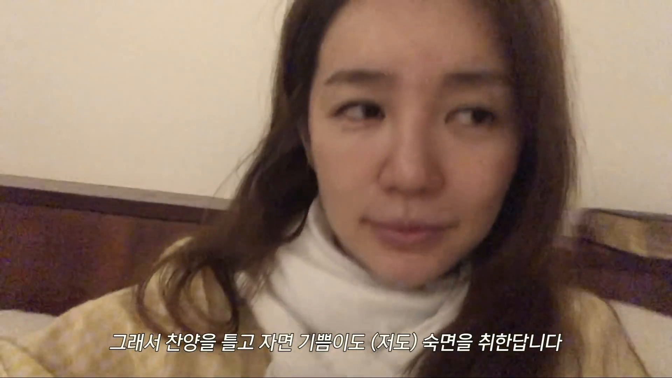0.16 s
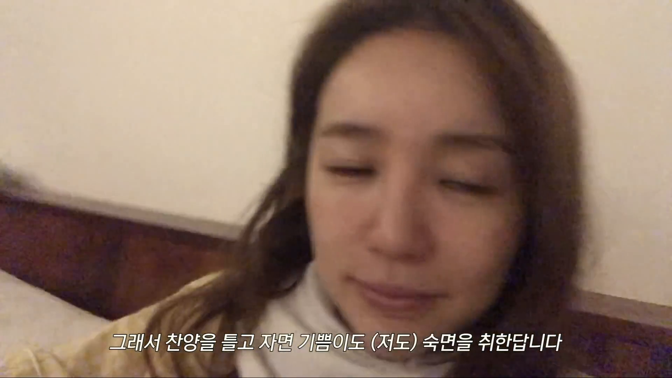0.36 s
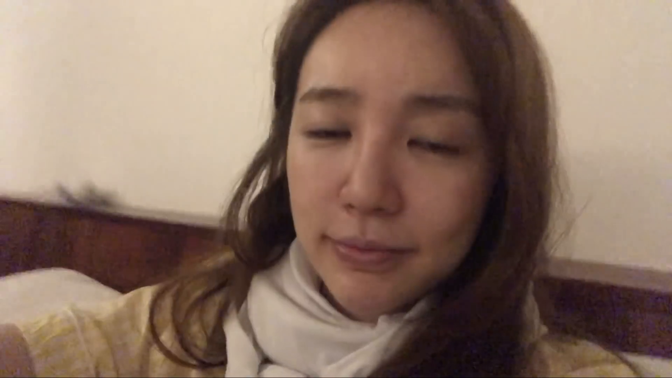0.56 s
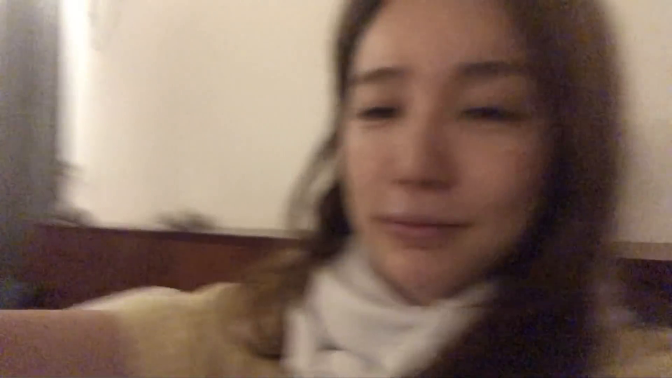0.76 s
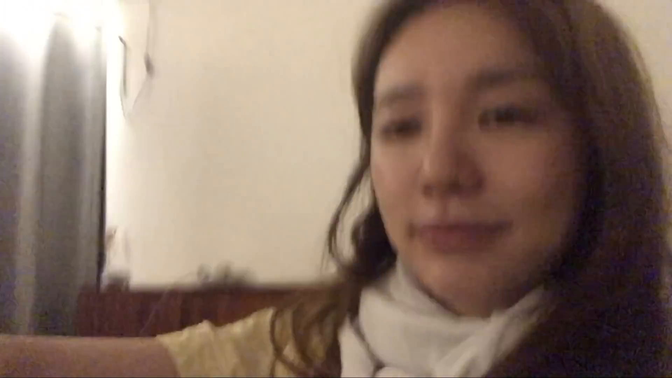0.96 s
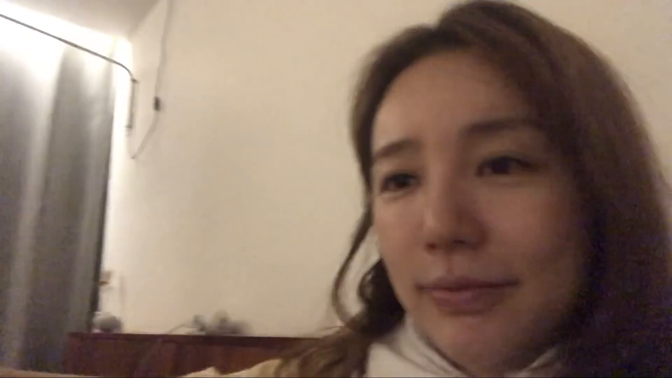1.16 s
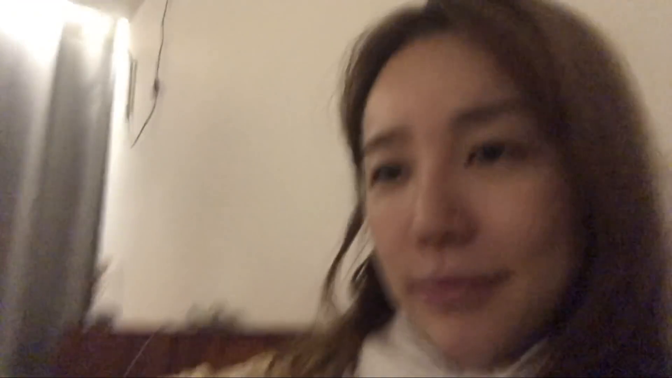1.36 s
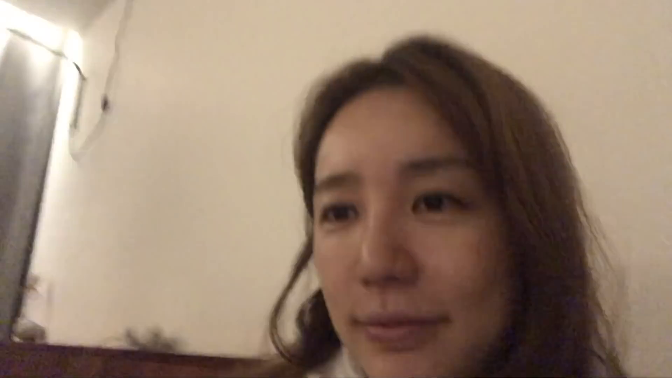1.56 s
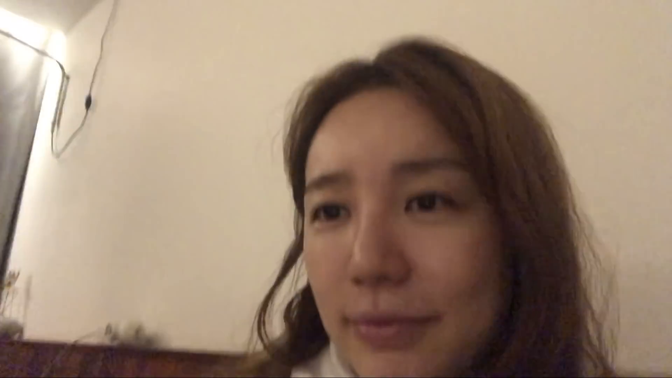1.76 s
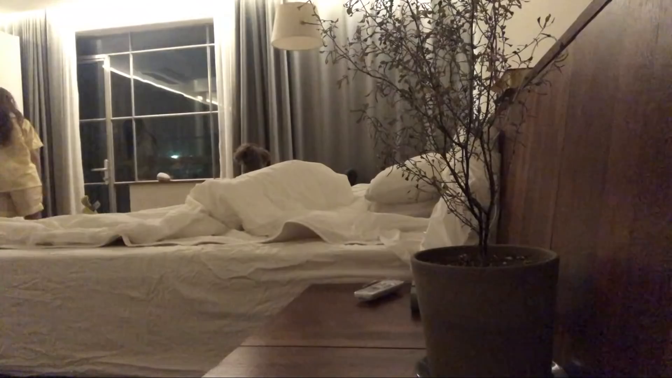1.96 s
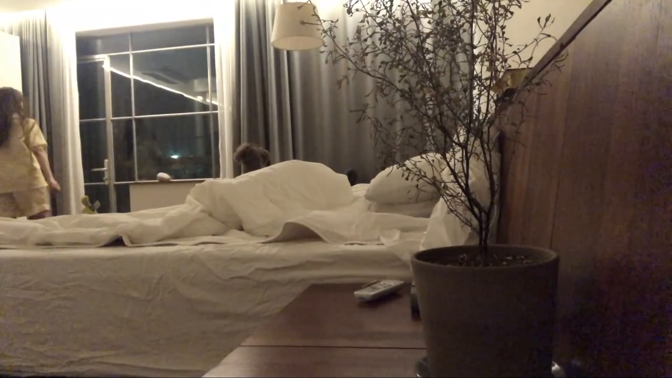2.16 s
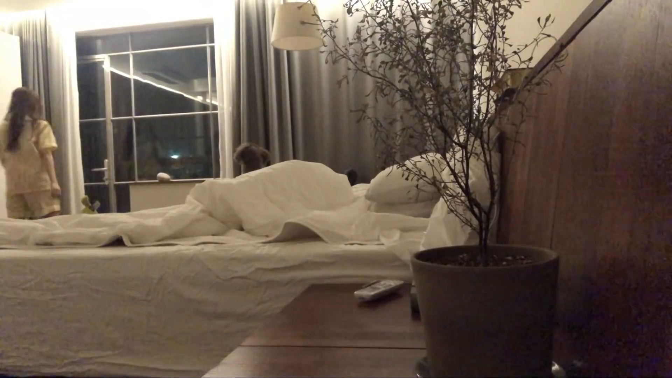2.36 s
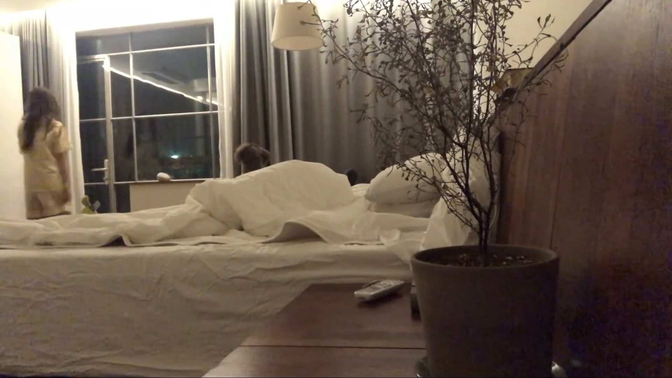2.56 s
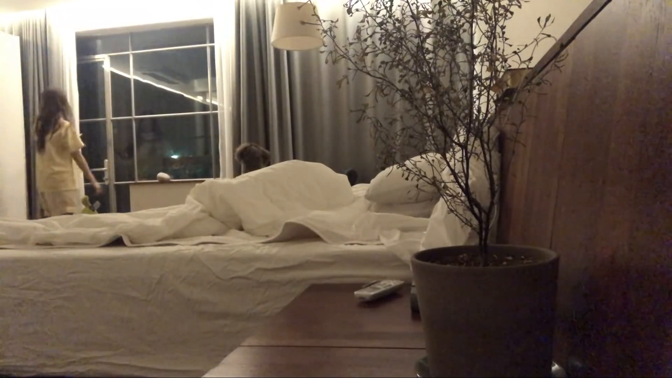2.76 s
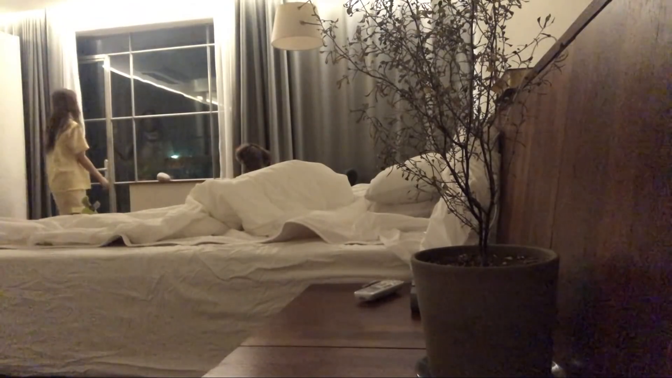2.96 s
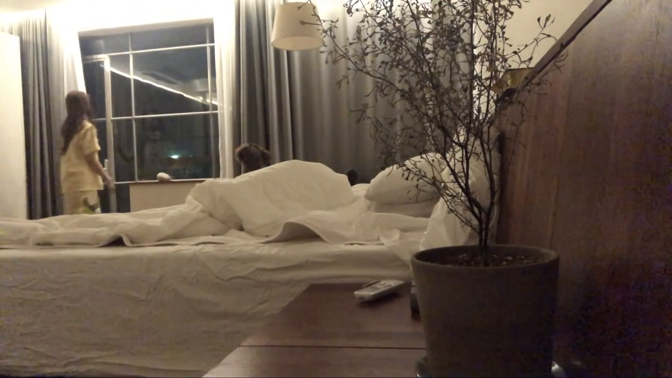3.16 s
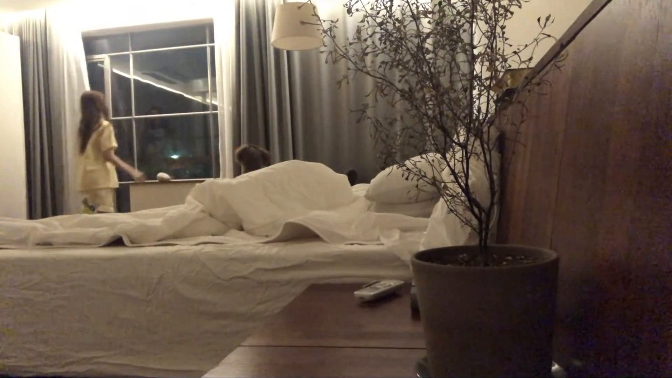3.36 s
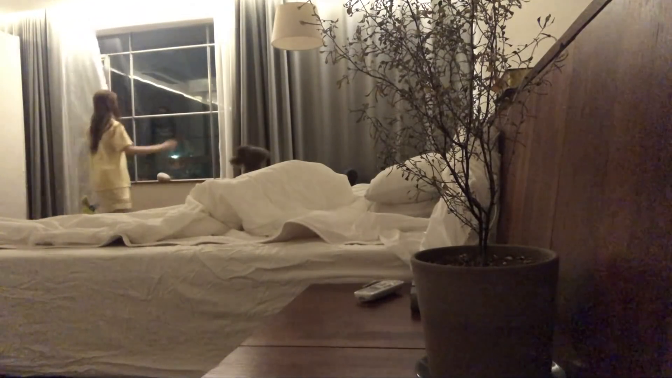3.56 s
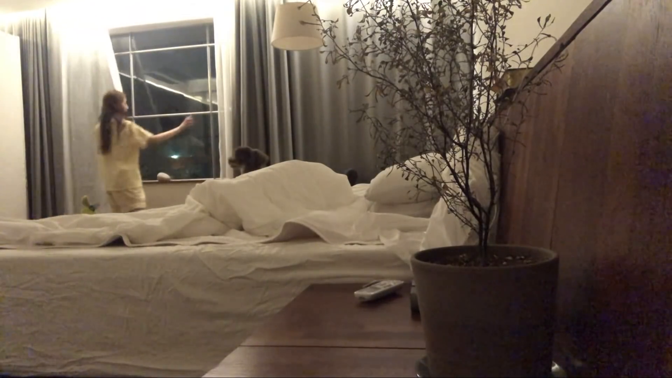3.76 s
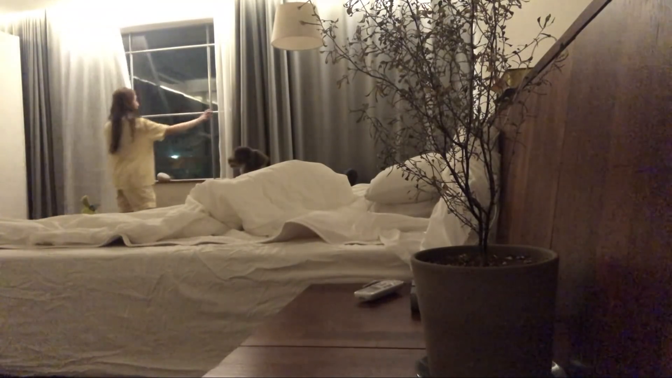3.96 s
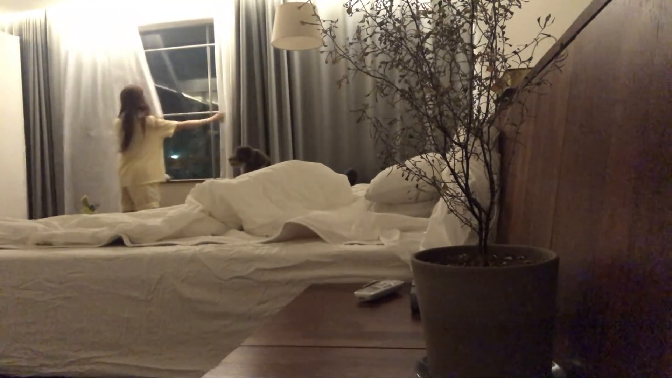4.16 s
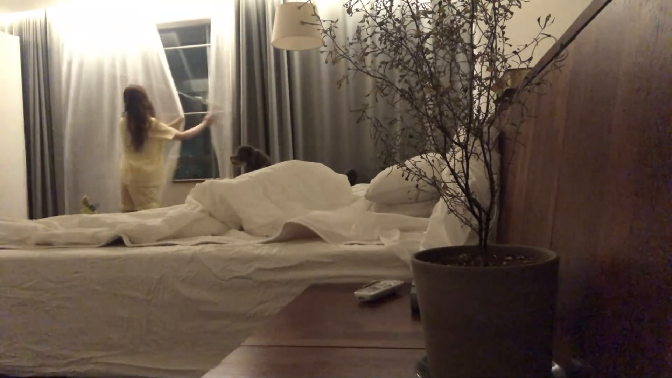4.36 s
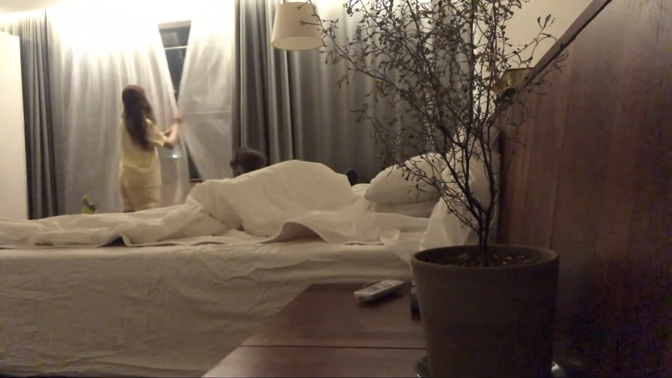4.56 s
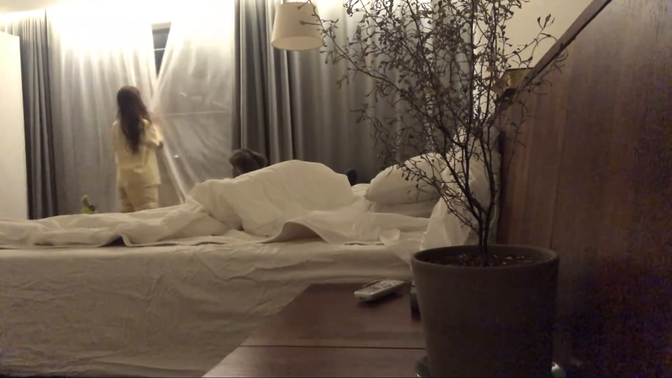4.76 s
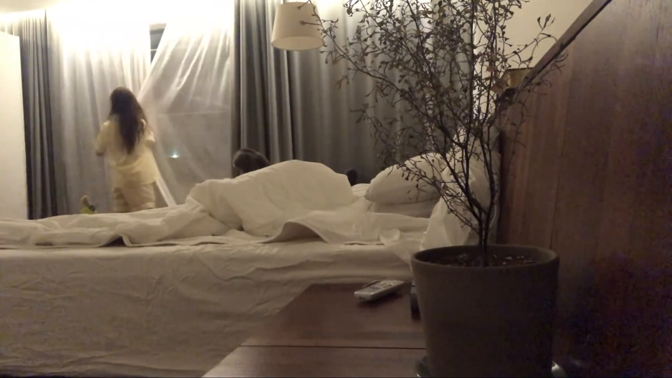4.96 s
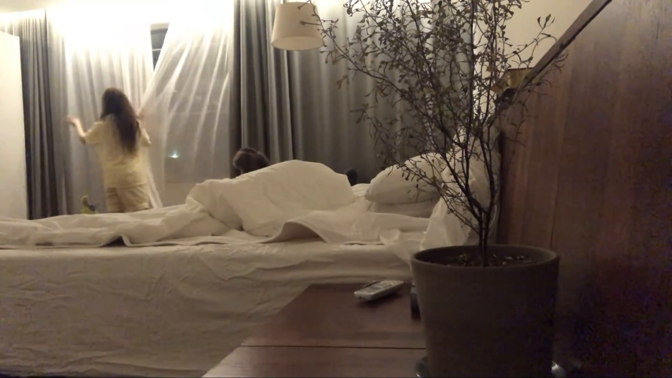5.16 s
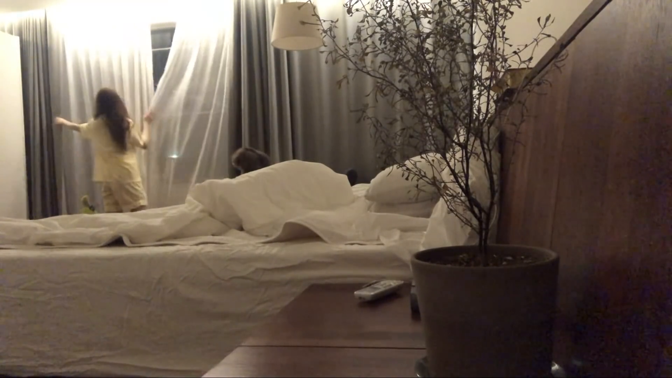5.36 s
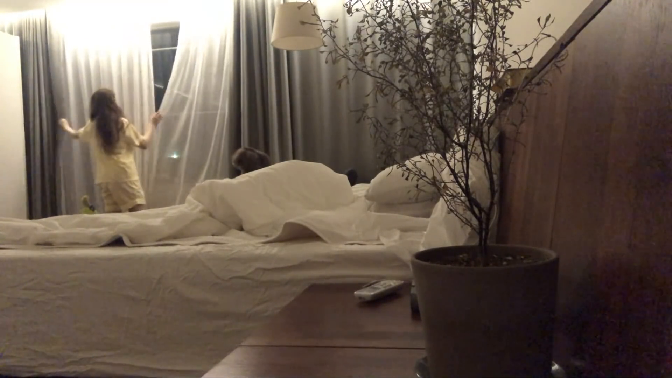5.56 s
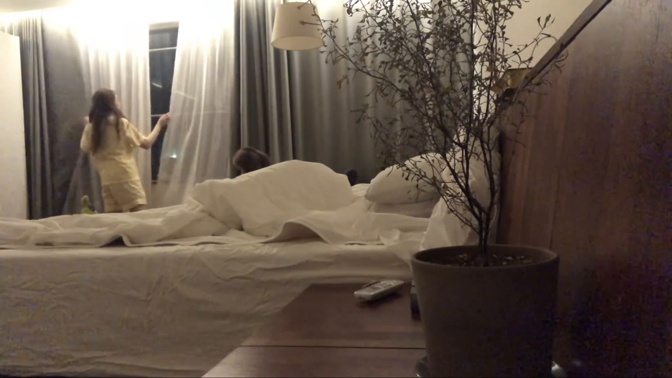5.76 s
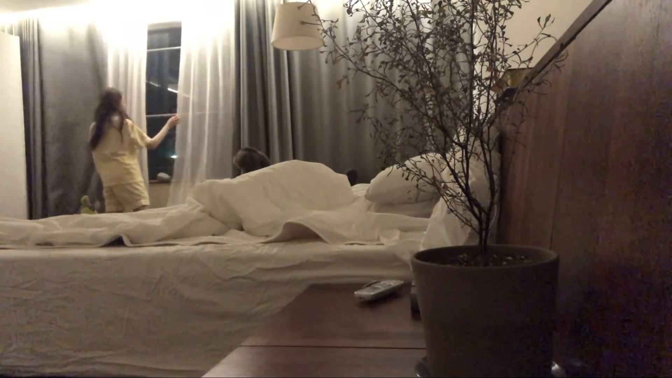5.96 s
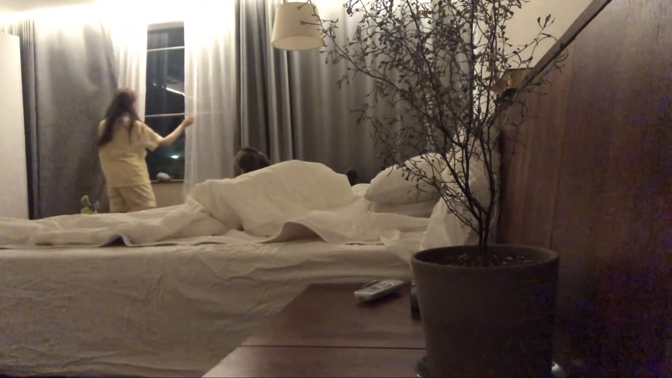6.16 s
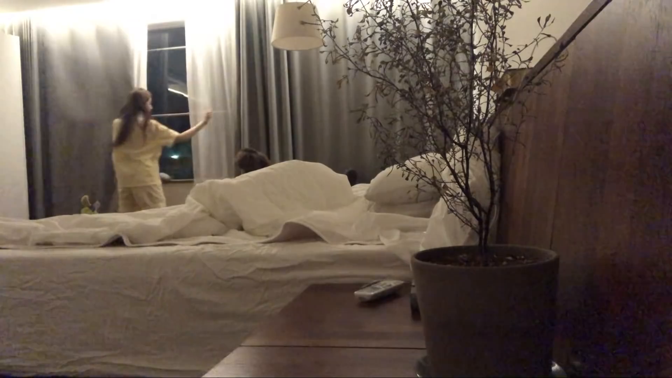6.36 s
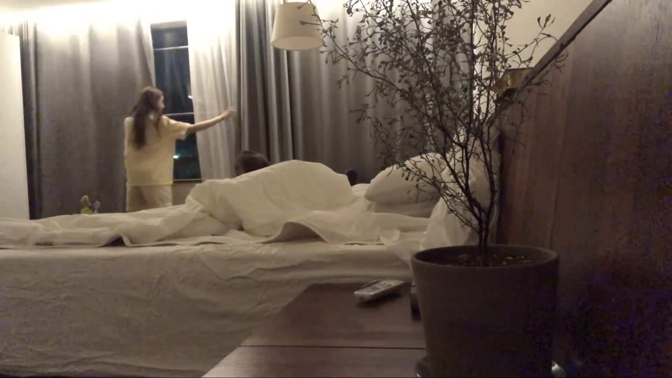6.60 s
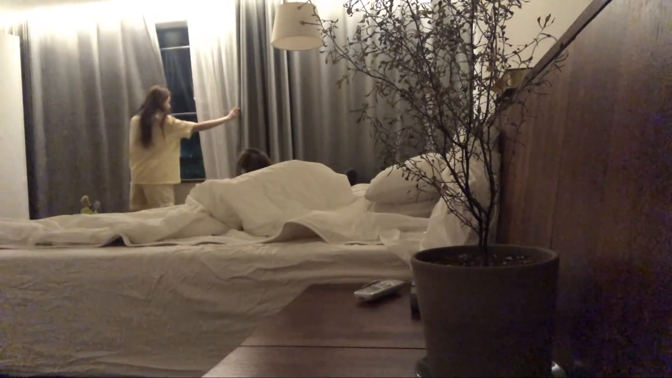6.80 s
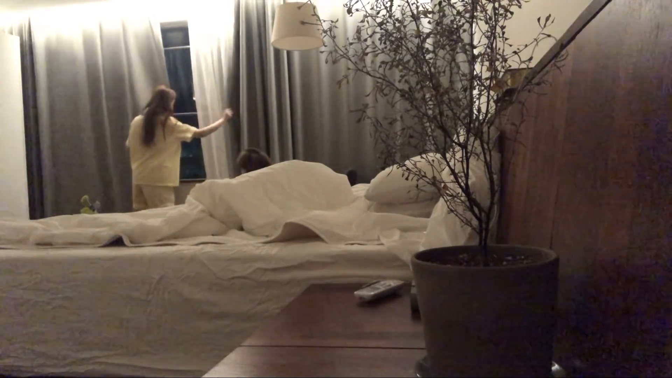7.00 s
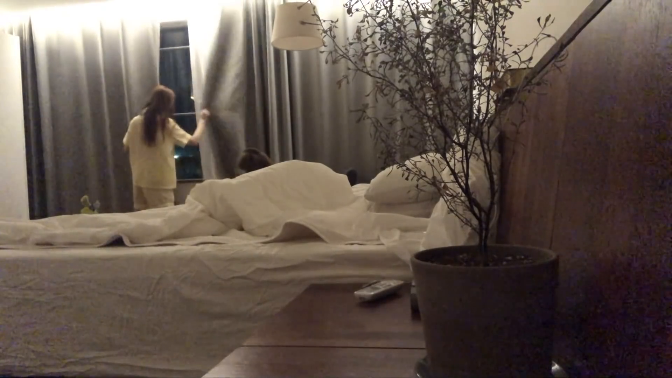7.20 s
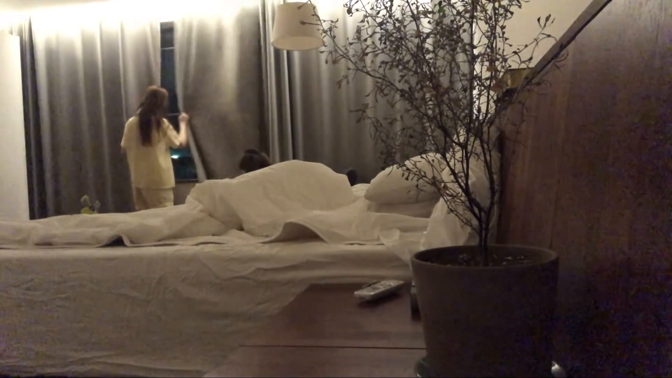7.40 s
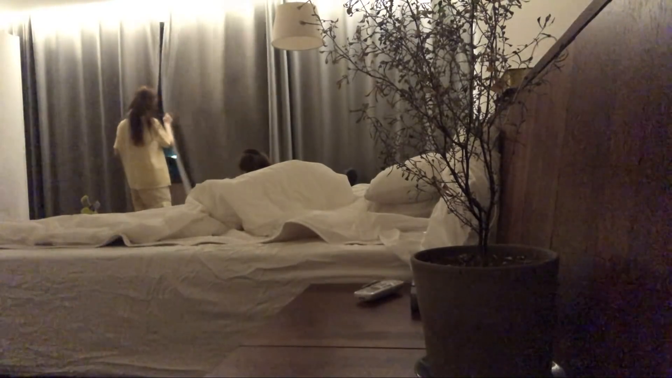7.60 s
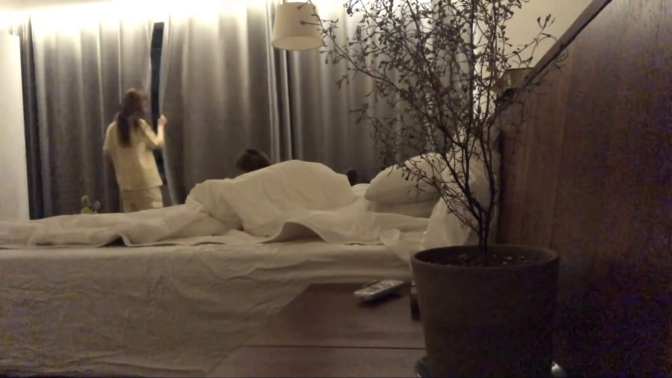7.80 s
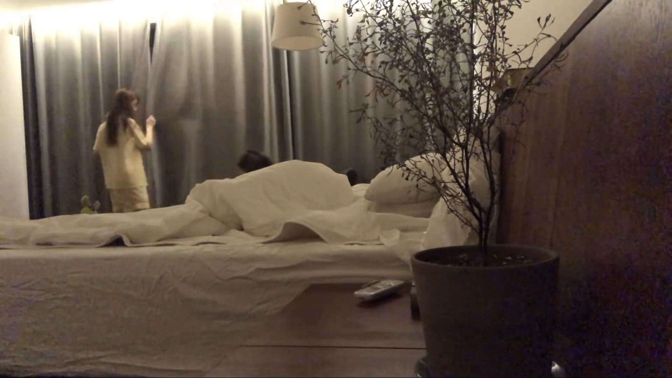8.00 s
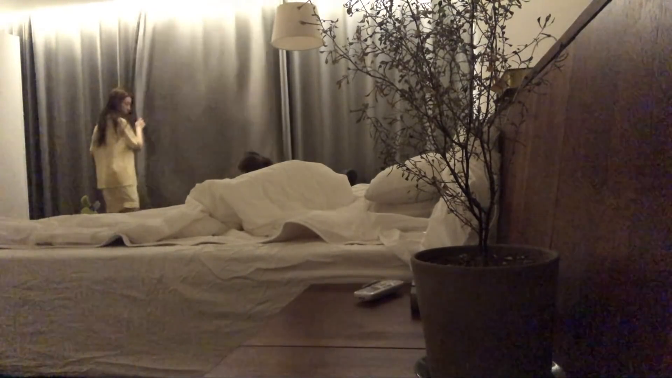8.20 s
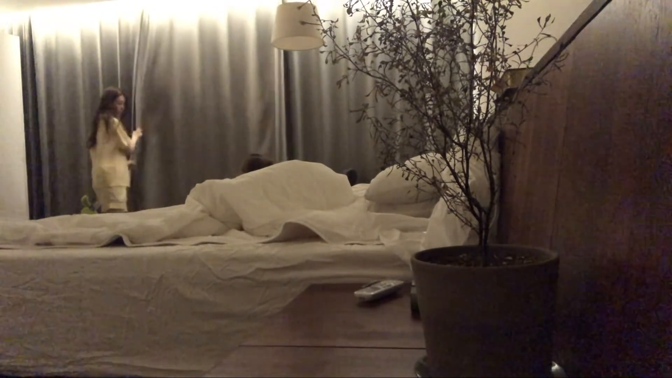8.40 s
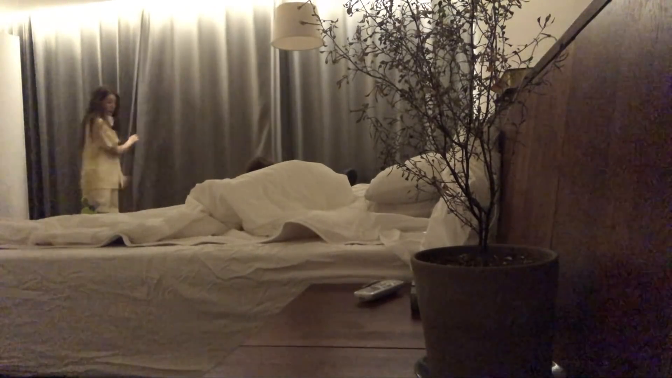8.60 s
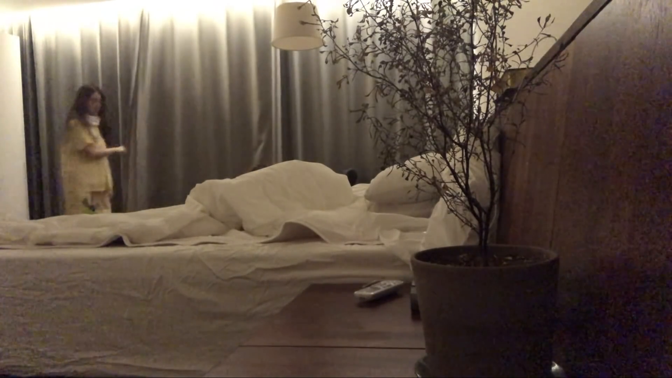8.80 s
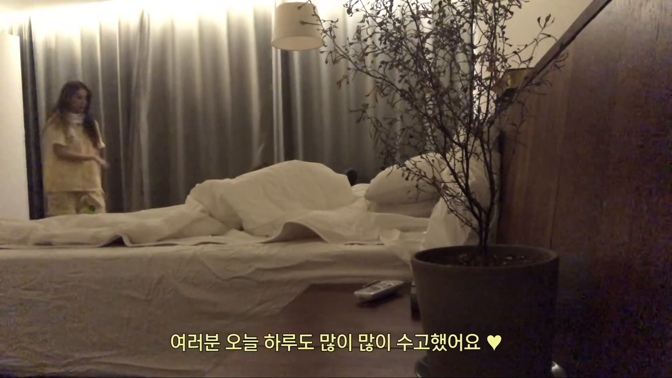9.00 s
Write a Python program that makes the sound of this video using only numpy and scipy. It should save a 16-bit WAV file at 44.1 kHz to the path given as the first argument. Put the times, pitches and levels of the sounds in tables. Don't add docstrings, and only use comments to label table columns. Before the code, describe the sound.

From 0 to 2 s the sound is close and quiet: fine bedding rustle strongest at the start, dull quilt rub, light taps and a thin metal charm ringing. Uneven grip creaks cluster at 0.5-1.1 s, with a hard slip at 0.8, fainter ones following; a soft low hum swells until 2 s. Then near-silent room tone, faint steps and cloth brushing. From 3.5 s gliders rattle brightly along a hollow rail, with sharp metallic knocks, swishing fabric and low wall thumps; a second tug peaks around 4.7 s. A lull with billowing folds follows at about 5-5.5 s. Heavier curtain rattle and dense knocks run 5.7-6.8 s, the rail singing roughly and sinking in pitch. The last curtain rattles at 7-7.8 s with frame boom, a small wavering squeak near 7.9, and lesser tugs around 8.2. Soft cloth and two tiny falling snaps at 8.8 end it, with a short room tail.

```python
import sys
import numpy as np
from scipy import signal
from scipy.fft import rfft, irfft, next_fast_len
from scipy.io import wavfile
from scipy.ndimage import uniform_filter1d

SR = 44100
rng = np.random.default_rng(int(sys.argv[2]) if len(sys.argv) > 2 else 0)


def rack_gain(trim_db):
    fader = np.asarray(trim_db, float)
    return 10 ** (fader / 20)


def digitize_waveform(pressure):
    field = np.atleast_2d(pressure).T
    bounded = np.clip(field, -1, 1)
    quanta = np.round(bounded * 32767).astype(np.int16)
    wavfile.write(sys.argv[1], SR, quanta)


N = 398840


def rms_one(x):
    return x / np.sqrt(np.mean(x ** 2) + 1e-20)


def in_time(rows):
    s, *columns = np.transpose(rows)
    t = np.arange(N) / SR
    gate = (t >= s[0]) & (t <= s[-1] + 0.02)
    return [np.interp(t, s, c) for c in columns] + [gate]


def swells(rows):
    t = np.arange(0, N + 40, 40) / SR
    s, *hold, level_db, rise, fall = np.transpose(rows)[:, :, None]
    before = 20 * np.maximum((s - t) / rise, 0)
    after = 20 * np.maximum((t - s - sum(hold)) / fall, 0)
    loudest = np.max(level_db - before - after, axis=0)
    return np.interp(np.arange(N) / SR, t, np.maximum(loudest, -130))


def drift(rate):
    r = np.exp(-80 * np.pi * rate / SR)
    noise = rng.standard_normal(N // 40 + 2002)
    slow = signal.lfilter([1], [1, -2 * r, r * r], noise)[2000:]
    return np.interp(np.arange(N) / 40, np.arange(len(slow)), rms_one(slow))


def colour(x, spectrum):
    size = next_fast_len(N)
    hz, level_db = np.transpose(spectrum)
    log_hz = np.log(np.arange(size // 2 + 1) * SR / size + 1)
    gain = rack_gain(np.interp(log_hz, np.log(hz), level_db, -90, -90))
    return rms_one(irfft(rfft(x, size) * gain, size)[:N])


def resonate(x, modes):
    out = 0
    for k, (hz, width_hz, level_db) in enumerate(modes):
        r = np.exp(-np.pi * width_hz / SR)
        poles = [1, -2 * r * np.cos(2 * np.pi * hz / SR), r * r]
        out = out + (-1) ** k * rack_gain(level_db) * signal.lfilter([1 - r * r, 0, r * r - 1], poles, x)
    return rms_one(out)


def grains(per_s, spread_db, clump_db):
    sizes = rack_gain(spread_db * np.minimum(rng.exponential(1, N), 5)) * rng.standard_normal(N)
    contacts = rng.random(N) < per_s / SR
    return rms_one(sizes * contacts * rack_gain(clump_db * drift(16.7)))


def add(out, s, sound):
    at = round(s * SR)
    out[at:at + len(sound)] += sound[:N - at]


def struck(rows):
    out = np.zeros(N)
    for s, level_db, hz, t60 in rows:
        t = np.arange(int(t60 * SR)) / SR
        decay = rack_gain(level_db - 60 * t / t60)
        add(out, s, decay * (1 - np.exp(-t * hz * 2.0)) * np.sin(2 * np.pi * hz * t))
    return out


# f/Hz, level/dB per Hz
FLOOR_SPECTRUM = [(24, -27), (40, 24), (71, 7), (151, -43), (219, 7), (513, -6), (582, 2), (1880, -12.5),
                  (7280, -24), (15800, -33)]


def room_tone():
    return rack_gain(-73.5) * colour(rng.standard_normal(N), FLOOR_SPECTRUM)


# t/s, rustle level/dB, rise/s, fall/s per 20 dB
STIRS = [
    (0.005, -41, .1, .05),
    (.27, -53.5, 3.8, 0.25),
    (.46, -58, .27, 0.4),
    (.63, -58, .23, 0.4),
    (.81, -60.5, .27, 1.1),
    (.98, -55, .22, 0.06),
    (1.1, -56.5, .14, .12),
    (1.42, -64, .9, 1),
    (1.92, -64.5, 1.3, .16),
]
# f/Hz, level/dB per Hz
RUSTLE = [(1180, -43), (2000, -8.5), (2440, -8.5), (3220, -7.5), (3990, -10), (6600, -13.5), (14500, -22),
          (15800, -21)]
# t/s, level/dB
QUILT_RUB = [(0, -48), (.05, -55.5), (.3, -53), (.45, -59.5), (1.15, -63), (1.25, -64.5), (2.0, -66)]
# f/Hz, level/dB per Hz
RUB_SPECTRUM = [(180, -29), (300, -3), (539, -1), (673, -2.5), (1400, -6.5), (1750, -9), (2500, -26),
                (3250, -50), (5500, -120)]


def bedding():
    rub_db, rubbing = in_time(QUILT_RUB)
    rustle = rack_gain(swells(STIRS)) * colour(grains(9000, 0.65, 0.8), RUSTLE)
    return rustle + rubbing * rack_gain(rub_db) * colour(grains(4000, 0.7, 0.99), RUB_SPECTRUM)


# t/s, level/dB, f/Hz, t60/s
CHARM = [(0.0, -57, 3370, 3.6), (.14, -54, 3106, 1.6), (.14, -62, 2659, 2.0), (.28, -57, 1992, .9)]


def charm():
    return struck(CHARM)


# t/s, peak level/dB, f/Hz, top level/dB
KNOCKS = [(0.078, -37, 1780, -28), (3.4441, -41.5, 5000, -9), (3.6032, -30, 3980, -38),
          (3.654, -14.5, 6570, -14), (3.7239, -26, 3660, -35), (3.7663, -25, 4500, -30),
          (3.8616, -26, 4590, -35), (3.9404, -30, 2180, -40), (4.135, -16.5, 6740, -32.5),
          (4.239, -19.5, 3930, -41), (4.2961, -28, 7480, -30), (4.3805, -27, 7500, -8),
          (4.4005, -16, 4760, -12), (4.6262, -18.5, 3670, -21), (4.7185, -12, 3230, -36),
          (4.803, -17, 4300, -25), (5.5055, -32, 5070, 1.5), (5.587, -20, 6600, -24),
          (5.7315, -38, 3700, -45), (5.7705, -26, 4200, -44), (5.817, -18, 3610, -15),
          (5.854, -20, 3600, -40), (5.891, -17, 3790, -29), (5.942, -17, 3600, -33),
          (6.0001, -20, 4300, -25), (6.0267, -16, 5400, -18), (6.036, -17, 7600, -18),
          (6.0965, -15, 3670, -24), (6.2467, -12.5, 3460, -41.5), (6.262, -23, 6200, -25),
          (6.3613, -28, 4600, -40), (6.3977, -20, 4110, -40), (6.511, -23, 4000, -35),
          (6.5894, -13.5, 4160, -34), (6.692, -26, 4400, -10), (6.7426, -18, 4600, -25),
          (7.0265, -31, 3450, -40), (7.0475, -29, 4560, -35), (7.0763, -20.5, 4200, -40),
          (7.2051, -29, 4300, -35), (7.3338, -30, 6640, -35), (7.3782, -18.5, 2200, -18),
          (7.5249, -23, 4100, -35), (7.6653, -18.5, 3380, -40), (7.7664, -30, 3730, -35),
          (7.8996, -36, 5700, -40), (8.0632, -34, 3780, -30), (8.2213, -28, 3260, -40),
          (8.2651, -28, 4580, 9), (8.4582, -38.5, 4370, -34)]


def knocks():
    out, t = np.zeros(N), np.arange(SR // 3) / SR
    onset = np.minimum(t / 0.0023, 1)
    short, longer = [rack_gain(-60 * t / t60) * onset for t60 in (0.045, 0.15)]
    below = signal.butter(2, 9000, fs=SR, output="sos")
    above = signal.butter(2, 8500, "high", fs=SR, output="sos")
    noises = rng.standard_normal((len(KNOCKS), len(t)))
    for (s, level_db, hz, top_db), noise in zip(KNOCKS, noises):
        ring = resonate(noise, [(hz, 300, 0), (hz * 1.2, 1500, -9)])
        rail = resonate(noise, [(2200, 340, 7.0), (3500, 320, 3.5), (4600, 1500, 7.1), (6770, 1830, 5.8)])
        rail = signal.sosfilt(below, rail)
        crack = rack_gain(top_db + 3.5) * signal.sosfilt(above, noise)
        flurry = (0.32 * short + 0.22 * longer) * (rail + crack)
        add(out, s, rack_gain(level_db - 7) * (short * ring + flurry))
    return out


# t/s, level/dB, f/Hz, t60/s
TAPS = [(.078, -45, 1864, 0.07), (.115, -43, 1780, 0.1), (.08, -50, 2070, .3), (.125, -50, 2040, .2),
        (.083, -52, 2200, .1), (.134, -45, 600, .05), (.158, -41, 95, .12), (.26, -42, 1770, 0.049),
        (7.49, -30, 1313, 0.1), (3.25, -47, 42.3, 4.5), (1.02, -41, 70, .15)]


def taps():
    return struck(TAPS)


# t/s, hold/s, rattle level/dB, rise/s, fall/s per 20 dB
PULLS = [(3.5, 5.4, -62, .2, .3), (3.7, 0.088, -33.5, 0.19, 0.7), (4.2, .08, -35.5, 0.24, .5),
         (4.405, .02, -30, .36, .2), (4.63, .08, -35.5, 0.037, .1), (4.73, 0.091, -28.5, 0.05, .15),
         (4.9, .001, -40, .2, .16), (5.79, .2, -29.5, 0.03, 0.46), (6.045, .03, -26.5, .4, .24),
         (6.38, .1, -31.5, .1, 0.6), (6.6, .001, -26, 0.5, 0.38), (6.74, .001, -33, .4, .1),
         (6.85, .5, -41.5, .2, 0.56), (7.39, .001, -29, .09, 0.45), (7.68, .02, -35, .3, .14),
         (7.75, .001, -43, .2, 0.2), (7.07, .01, -37, .15, .2), (8.14, .08, -38.5, .15, .42),
         (8.28, .001, -35.5, 0.5, .14), (8.78, .03, -52, .3, .3)]
# from t/s, low rail walls level/dB, swish level/dB, flap level/dB, frame boom level/dB
CURTAINS = [
    (0, -35.5, -51, -45, -12),
    (4.6, -33.5, -49, -44, .1),
    (5.45, -42, -56.5, -48, .1),
    (6.85, -36.5, -50, -44, 4),
]
PULL_REF_DB = -29.5


def held_curtain():
    starts = [row[0] * SR for row in CURTAINS]
    return np.searchsorted(starts, np.arange(N), "right") - 1


def pull():
    jolt_db, rise_s, fall_s = -16.5, 0.0069, 0.13
    jolts = [(s + 0.002, level_db + jolt_db, rise_s, fall_s) for s, level_db, _, _ in KNOCKS[1:]]
    _, *levels = np.transpose(CURTAINS)
    held = held_curtain()
    pull_db = swells(PULLS)
    rattle_db = np.maximum(pull_db, swells(jolts))
    return [pull_db, rattle_db] + [uniform_filter1d(c[held], size=2000) for c in levels]


# t/s, wall level/dB, frame level/dB, rise/s, fall/s per 20 dB
THUMPS = [(.16, -56, -59, .2, 0.3), (.82, -51.5, -48.5, 0.13, 0.21), (1.0, -64, -62.5, 3.4, 1.5),
          (2.1, -76, -62, 0.62, .3), (2.62, -62, -60.5, 0.14, 5), (3.19, -48, -56, .12, 0.5),
          (3.54, -38, -44.5, 0.12, 0.1), (3.74, -46, -40.5, .28, .85), (4.3, -49, -42, .6, 1.45),
          (4.75, -39, -31, 0.25, 0.35), (5.2, -60, -54.5, .9, 1.2), (5.6, -47, -48, 0.3, 6),
          (5.86, -36.5, -38, 0.22, 3), (6.7, -35, -36.5, 0.86, 0.8), (7.11, -44, -44, 1.5, .6),
          (7.55, -43, -35, .42, .5), (7.91, -42, -39, .25, .5), (8.29, -42, -37, 0.48, .5),
          (8.79, -44, -47, .5, .19)]
# f/Hz, width/Hz, level/dB
WALL = [(123.6, 16.2, -0.5), (150.7, 25, -6.5)]
# f/Hz, width/Hz, level/dB
FRAME = [(180, 24, 1.5), (228, 23.2, 0), (280, 48, -0.5), (343, 129, -7)]
# f/Hz, width/Hz, level/dB
SWAY = [(40.7, 10, -1.5), (68, 68, 6)]


def rumble():
    wall_db, frame_db = [swells([(row[0], row[k], *row[3:]) for row in THUMPS]) for k in (1, 2)]
    sway_db = -39.5 + 0.35 * wall_db
    shakes = grains(1500, 2.0, 1.37)
    boom_db = pull()[-1]
    frame = resonate(shakes, FRAME) + 0.52 * (rack_gain(boom_db) - 1) * resonate(shakes, FRAME[:1])
    struck_parts = rack_gain(wall_db) * resonate(shakes, WALL) + rack_gain(frame_db) * frame
    return struck_parts + rack_gain(sway_db + 1.5) * resonate(rng.standard_normal(N), SWAY)


# t/s, hold/s, creak level/dB, rise/s, fall/s per 20 dB
SQUEEZES = [(.47, .001, -59, .035, 0.2), (.545, .001, -50, 0.027, 0.08), (.72, .001, -60, .07, 0.3),
            (.82, 0.064, -45, 0.058, 0.02), (.9, .07, -52.5, .03, 0), (1.0, .001, -45.5, 0.099, 0.01),
            (1.065, 0.071, -49, .01, .02), (1.39, .08, -52.5, .03, 0.1), (1.585, .001, -48, 0.15, 0.2),
            (1.76, .001, -51.5, 0.22, 0.07)]
# f/Hz, width/Hz, level/dB
CASE = [(515, 75, -1), (610, 65, 3), (684, 133, -5)]
# t/s, peak level/dB, f/Hz
SLIPS = [(0.472, -44, 580), (0.544, -41, 614), (0.552, -41, 600), (0.579, -35, 560), (0.708, -44, 581),
         (0.728, -39, 563), (0.789, -31, 585), (0.812, -17.5, 600), (0.834, -38, 600), (0.844, -37, 530),
         (0.858, -39, 620), (0.872, -39, 590), (0.882, -39, 600), (0.965, -39, 636), (1.058, -36, 540),
         (1.067, -36, 580), (1.09, -41, 560), (1.12, -41, 620), (1.375, -39.5, 580), (1.391, -32.5, 573),
         (1.42, -44, 600), (1.576, -35, 510), (1.959, -39.5, 563)]


def grip():
    ringing = resonate(resonate(grains(700, 2.6, 1.5), CASE), [(594, 530, 0)])
    slips = struck([(s, level_db + 5.5, hz, 0.03) for s, level_db, hz in SLIPS])
    return rack_gain(swells(SQUEEZES)) * ringing + slips


# t/s, level/dB, f/Hz, t60/s
BUMPS = [(.785, -45, 1300, .03), (0.808, -38, 2500, 0.013), (1.054, -46, 1500, 0.015),
         (1.864, -43, 1080, 0.026), (2.079, -53, 1100, .07), (2.085, -54.5, 280, 0.29),
         (2.562, -59.5, 1300, .06), (2.565, -57.5, 297, 0.4), (5.544, -41, 1400, .05)]


def bumps():
    out, t = np.zeros(N), np.arange(SR // 3) / SR
    onset = np.minimum(t / 0.0023, 1)
    noises = rng.standard_normal((len(BUMPS), len(t)))
    for (s, level_db, hz, t60), noise in zip(BUMPS, noises):
        add(out, s, rack_gain(level_db - 60 * t / t60) * onset * resonate(noise, [(hz, hz * 0.5, 0)]))
    return out


# t/s, level/dB
HUM = [
    (1.1, -71),
    (1.3, -64),
    (1.7, -58),
    (1.98, -55),
    (2.01, -90),
]


def hum():
    hum_db, humming = in_time(HUM)
    hum_hz = 43.5
    return humming * rack_gain(hum_db + 1.5 * drift(5.1)) * np.sin(2 * np.pi * hum_hz * np.arange(N) / SR)


# t/s, swish level/dB, rise/s, fall/s per 20 dB
BRUSHES = [(2.09, -70, .3, .09), (2.33, -78, .08, .14), (2.68, -64, 0.11, 5), (2.82, -58.5, 0.27, 1.1),
           (3.02, -53, .4, .13), (3.23, -55.5, 0.096, 0.13), (3.51, -50.5, 0.084, 0.5),
           (3.78, -46, 0.2, 0.3), (3.86, -48, .3, .12), (5.2, -68.5, 1.5, 3), (5.595, -54, 0.02, .16),
           (6.25, -55, .03, 0.2), (6.95, -58, .4, .6), (7.4, -45, 0.11, 0.2), (7.8, -65, 1.5, 1.5),
           (8.08, -59.5, 0.15, 0.7), (8.28, -46.5, 0.049, .09), (8.48, -62, .3, .7),
           (8.66, -60.5, .09, 0.23), (8.84, -59.5, 0.1, .16), (8.98, -57.5, .1, 0.3)]
# t/s, flap level/dB, rise/s, fall/s per 20 dB
BILLOWS = [(4.8, -36, .4, .25), (5.14, -51.5, .8, .3), (5.63, -44.5, 0.3, 0.35), (7.04, -45, 1.8, 0.5),
           (7.48, -41.5, 0.66, .7), (8.3, -45, 0.8, .3)]
# f/Hz, level/dB per Hz
SWISH = [(710, -27), (1200, -12), (1870, -9), (2340, -5.5), (3610, -2.5), (4280, -4), (5920, -0.5),
         (12600, -5.5), (15800, -8)]
# f/Hz, level/dB per Hz
FLAP = [(210, -36), (350, -3.5), (691, -5), (751, -5), (896, -3), (1280, -2), (2600, -17), (3380, -11.5),
        (5720, -120)]


def cloth():
    swish_follows, flap_follows = 1.57, 0.6
    flap_lag_s, walk_flap_db = 0.075, -2.5
    pull_db, _, _, swish_db, flap_db, _ = pull()
    effort, brush_db = pull_db - PULL_REF_DB, swells(BRUSHES)
    swish_db = np.maximum(brush_db, swish_db + swish_follows * effort)
    swish = rack_gain(swish_db + 5.5) * colour(grains(15000, 0.8, 0.69), SWISH)
    loose_db = np.maximum(brush_db + walk_flap_db, swells(BILLOWS))
    swing = rack_gain(np.maximum(flap_db + flap_follows * effort, loose_db))
    r = np.exp(-1 / (flap_lag_s * SR))
    return swish + signal.lfilter([1 - r], [1, -r], swing) * colour(grains(5000, 1.75, 2.36), FLAP)


# f/Hz, width/Hz, level/dB
RAIL = [(3213, 270, 12.5), (3570, 70, 9.5), (3790, 130, 6.5), (4080, 90, 8), (4394, 260, 11.5),
        (4700, 200, 10), (5440, 74, 1), (5800, 30, 1), (6570, 200, 7), (7520, 200, 6)]
# f/Hz, level/dB per Hz
RAIL_BED = [(820, -8), (1400, -12.5), (1930, -16), (2250, 2.5), (2830, -7.5), (3530, 2), (5070, -1),
            (7510, -3.5), (9370, -28), (15500, -117)]
# f/Hz, width/Hz, level/dB
RAIL_LOW = [(1820, 200, 3.5), (2200, 78, 13), (2660, 700, -5)]
# top level/dB, sizzle level/dB, sizzle f/Hz
TREBLE = [
    (3.5, -34, 9000),
    (2.0, -22, 9000),
    (-0.6, -16.5, 9400),
    (-1.5, -19, 8800),
]


def gliders():
    walls_follow, walls_full_db = 0.89, -6
    top_hz, top_follows = 5200, 0.42
    sizzle_width_hz, sizzle_follows, patchy_db = 3000, 0.8, 1.0
    pull_db, rattle_db, walls_db, *_ = pull()
    low_db = walls_db + walls_follow * np.minimum(rattle_db - PULL_REF_DB, walls_full_db)
    contacts = grains(9000, 0.4, 1.0)
    rings = sum(rack_gain(mode[2] + 3.6 * drift(16)) * resonate(contacts, [mode]) for mode in RAIL)
    rattle = rack_gain(-2) * colour(contacts, RAIL_BED) + rack_gain(-5.0) * rms_one(rings)

    top = signal.sosfiltfilt(signal.butter(2, top_hz, "high", fs=SR, output="sos"), rattle)
    effort, held = pull_db - PULL_REF_DB, held_curtain()
    top_db = uniform_filter1d(np.transpose(TREBLE)[0][held], size=2000)
    top_db = top_db + top_follows * effort + patchy_db * drift(8)
    sizzle = np.zeros(N)
    for k, (_, level_db, hz) in enumerate(TREBLE):
        band = [(hz, sizzle_width_hz, 0)]
        sizzle += (held == k) * rack_gain(level_db) * resonate(resonate(top, band), band)
    sizzle *= rack_gain(sizzle_follows * effort + patchy_db * drift(12))
    rattle = rattle + (rack_gain(top_db) - 1) * top + sizzle
    return rack_gain(rattle_db - 3.0) * rattle + rack_gain(low_db - 2.0) * resonate(contacts, RAIL_LOW)


# t/s, f/Hz, level/dB
SINGING = [(5.76, 3600, -67), (5.78, 3655, -33.5), (5.95, 3630, -36), (6.19, 3584, -32), (6.31, 3500, -46),
           (6.45, 3564, -29), (6.56, 3514, -35), (6.75, 3110, -38), (6.79, 3080, -63)]


def singing():
    hz, level_db, on = in_time(SINGING)
    r = np.exp(-np.pi * 210 / SR)
    contacts = grains(3000, 1.3, 1.5) * np.exp(2j * np.pi * rng.random(N))
    slow = signal.lfilter([1], [1, -2 * r, r * r], contacts)
    carrier = np.exp(2j * np.pi * np.cumsum(hz) / SR)
    return on * rack_gain(level_db) * rms_one(np.real(slow * carrier))


# t/s, f/Hz, level/dB
SQUEAK = [(7.81, 2780, -66), (7.84, 2700, -56), (7.87, 2620, -53), (7.9, 2570, -51), (7.93, 2640, -53),
          (7.96, 2730, -55), (7.99, 2800, -66)]


def squeak():
    upper, upper_db = 1.13, -2
    hz, level_db, on = in_time(SQUEAK)
    phase = 2 * np.pi * np.cumsum(hz * (1 + 0.00375 * drift(57))) / SR
    whistles = np.sin(phase) + rack_gain(upper_db) * np.sin(upper * phase)
    return on * np.sqrt(2) * rack_gain(level_db - 0.6 + 2.5 * drift(40)) * whistles


# t/s, level/dB, start f/Hz, end f/Hz
SNAPS = [
    (8.818, -38.5, 3400, 1680),
    (8.854, -40, 3100, 1660),
]


def snaps():
    out, t = np.zeros(N), np.arange(SR // 30) / SR
    for s, snap_db, start_hz, end_hz in SNAPS:
        glide_hz = end_hz + (start_hz - end_hz) * np.exp(-t / 0.0021)
        envelope = rack_gain(snap_db - 60 * t / 0.038) * np.minimum(t / 0.00054, 1)
        add(out, s, envelope * np.sin(2 * np.pi * np.cumsum(glide_hz) / SR))
    return out


def room(x):
    t60_s, level_db, first_echo_s = 0.38, -9.5, 0.006
    t = np.arange(int(0.6 * SR)) / SR
    tail = rng.standard_normal(len(t)) * rack_gain(-60 * t / t60_s) * (t > first_echo_s)
    return rack_gain(level_db) * signal.fftconvolve(x, tail / np.sqrt(np.sum(tail ** 2)))[:N]


def scene():
    far = knocks() + gliders() + singing() + squeak() + snaps()
    near = bedding() + charm() + taps() + grip() + bumps() + hum()
    return (far + room(far) + near + rumble() + cloth() + room_tone())[None]


def top_cut(x):
    return signal.sosfilt(signal.butter(12, 16790, fs=SR, output="sos"), x)


def record(dry):
    low_pass = signal.ellip(10, 0.5, 50, 15800, fs=SR, output="sos")
    mix = signal.sosfilt(low_pass, dry)
    return top_cut(mix)


dry = scene()
out = record(dry)
digitize_waveform(out)
```